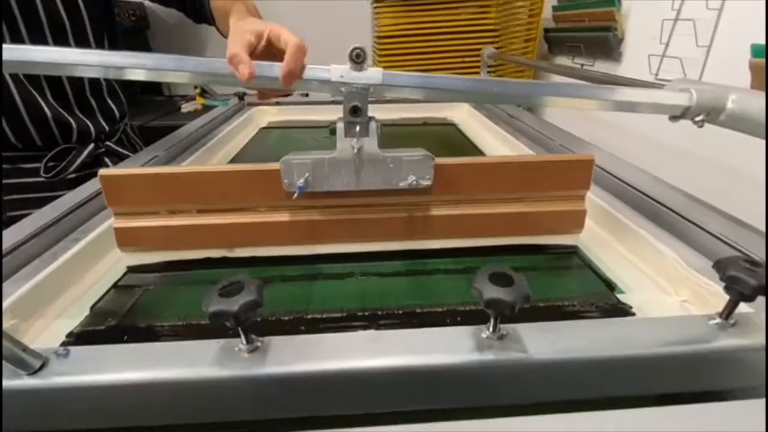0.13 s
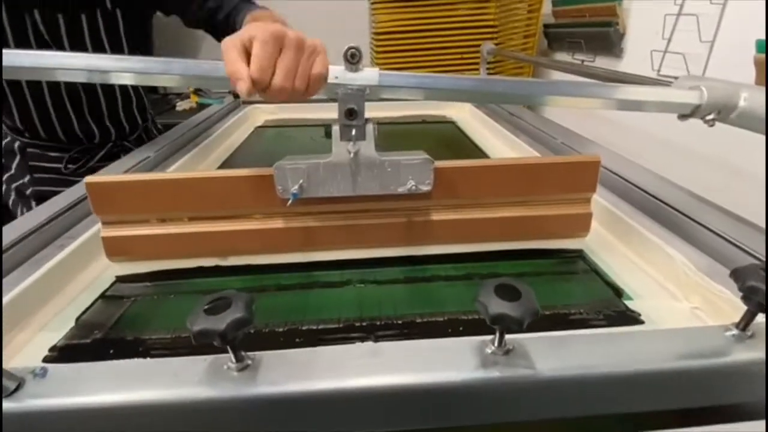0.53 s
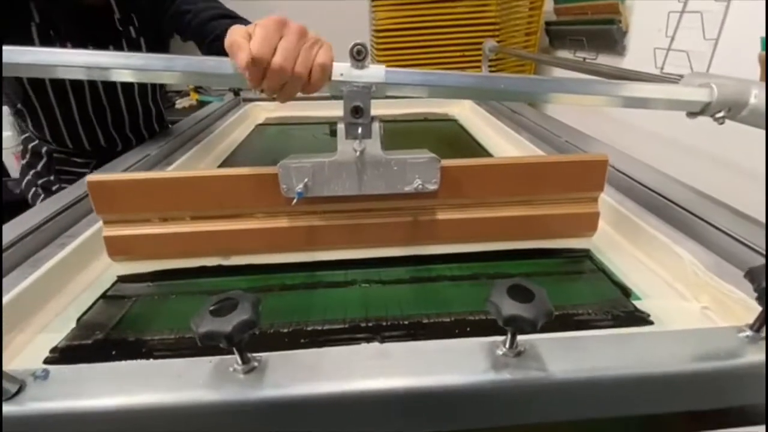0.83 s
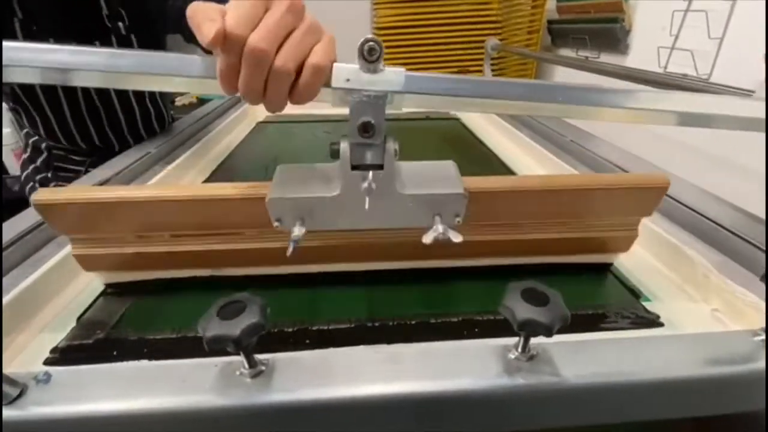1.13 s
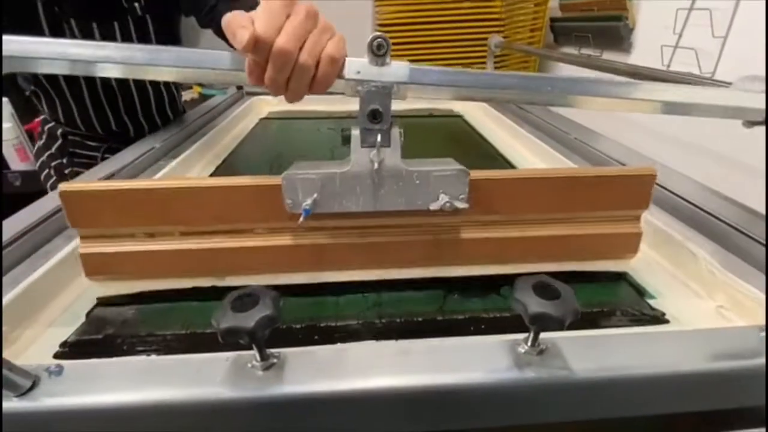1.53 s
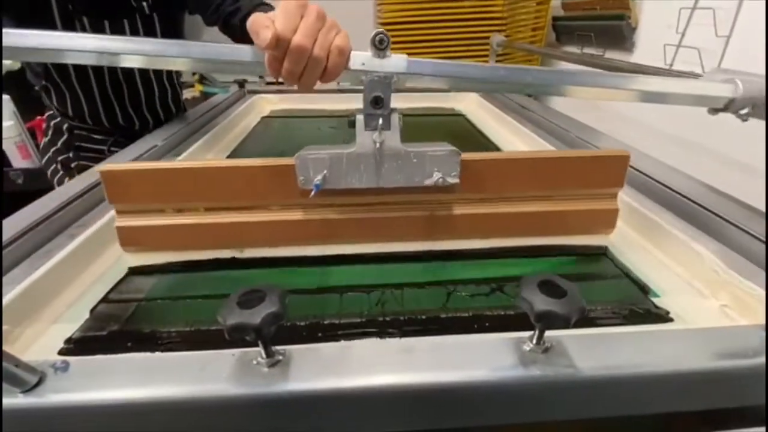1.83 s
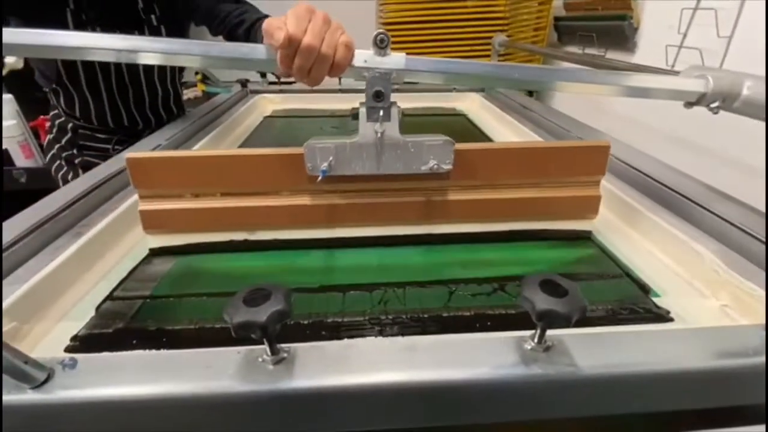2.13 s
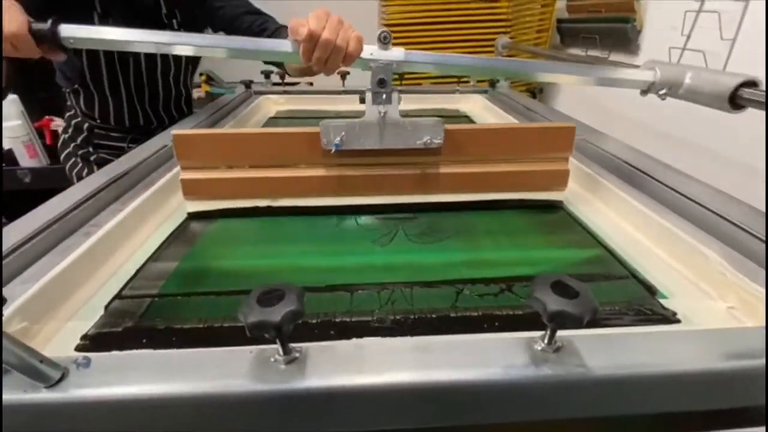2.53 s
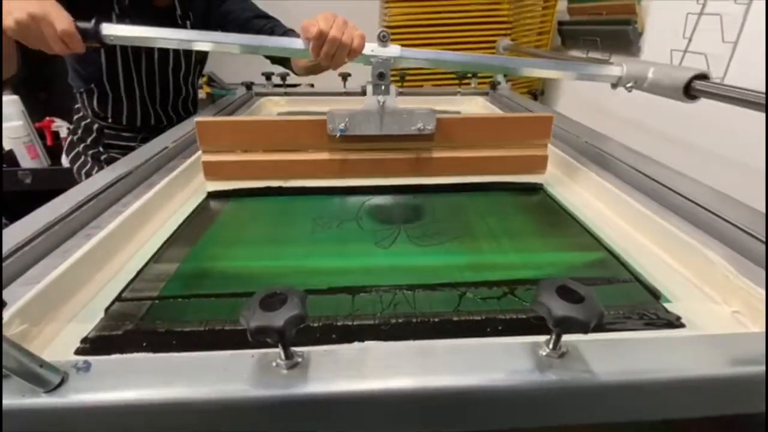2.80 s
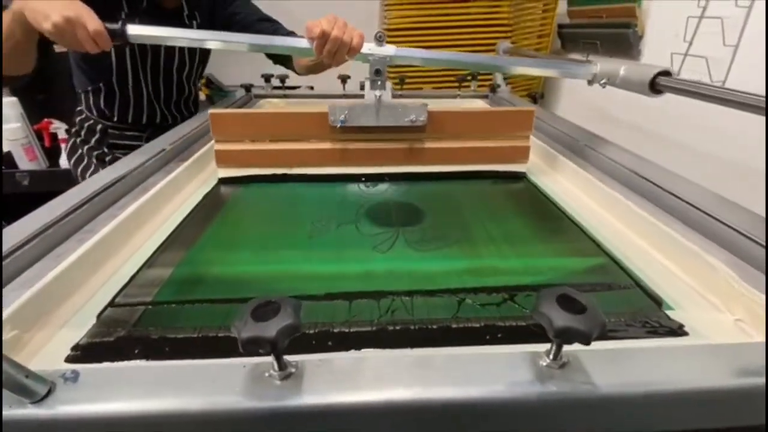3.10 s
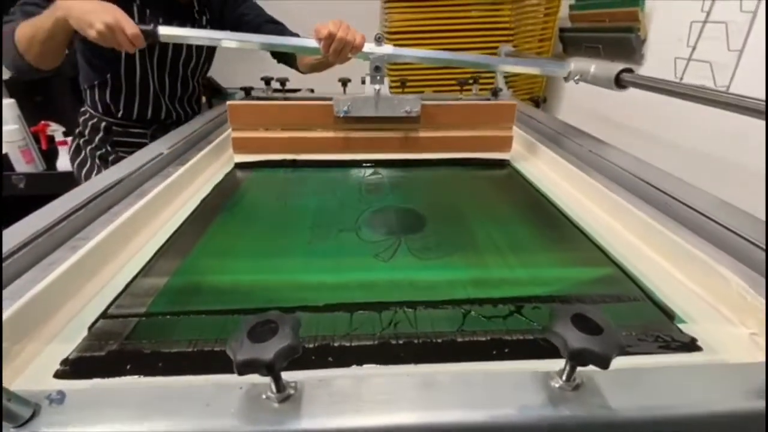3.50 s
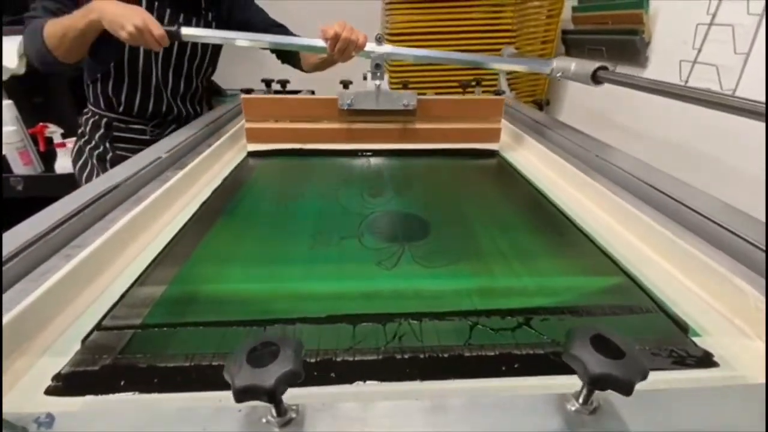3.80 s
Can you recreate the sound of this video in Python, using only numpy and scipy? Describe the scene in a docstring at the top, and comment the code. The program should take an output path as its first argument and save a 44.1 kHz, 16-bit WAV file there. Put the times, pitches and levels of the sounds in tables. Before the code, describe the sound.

A squeegee whirs across an inky printing screen after sharp clacks, over a machine hum.

```python
"""A machine hums and blows in a small workshop throughout. First a squeegee blade whirs briefly over a
printing screen. The carriage of its lever arm scuffs, then clacks against its stop at 0.9 s and rattles
in the frame. At 1.2 s the squeegee lands in the ink with a knock and a soft thump. From 1.6 s it is drawn
across the mesh twice, a short stroke and a long one, with one more clack at 2.4 s. The faster the blade
crosses the threads, the higher it whirs."""
import sys
import numpy as np
from scipy import signal
from scipy.fft import rfft, irfft, next_fast_len
from scipy.io import wavfile

SR = 44100
rng = np.random.default_rng(int(sys.argv[2]) if len(sys.argv) > 2 else 0)


def materialize(psi):
    """Save the field psi as 16-bit PCM at rate SR to the path in sys.argv[1].

    A 1-D psi becomes a single channel; in a 2-D psi each row is a channel.
    """
    bounded = np.clip(np.atleast_2d(psi).T, -1, 1)
    quanta = np.round(bounded * 32767).astype(np.int16)
    wavfile.write(sys.argv[1], SR, quanta)


N = 174195

def amp(db):
    """Turn decibels into a gain."""
    return 10 ** (np.asarray(db) / 20)

def unit(x):
    """Scale a signal to an average (rms) level of 1."""
    return x / np.sqrt(np.mean(x ** 2) + 1e-20)

def along(points, hz):
    """Read a curve of (Hz, value) points at any frequency, on a log axis."""
    freqs, values = np.transpose(points)
    return np.interp(np.log(hz + 1), np.log(freqs + 1), values)

def filtered(x, response):
    """Turn each frequency up or down by the gain response(hz)."""
    size = next_fast_len(N + SR // 2)
    return irfft(rfft(x, size) * response(np.fft.rfftfreq(size, 1 / SR)), size)[..., :N]

# How alike left and right sound. Each row: frequency in Hz, likeness (1 is identical).
STEREO_LIKENESS = [(60, 1), (140, 0.99), (300, 0.92), (600, 0.4), (1200, 0.055), (2500, 0.027),
                   (6000, 0.35), (11000, 0.096)]
def rush(gain):
    """Stereo noise shaped by gain(hz), nearly the same on both sides in the bass."""
    def response(hz):
        angle = np.arccos(np.clip(along(STEREO_LIKENESS, hz), -1, 1)) / 2
        return gain(hz) * np.array([np.cos(angle), np.sin(angle)])
    mid, side = filtered(rng.standard_normal((2, N)), response)
    return unit(np.array([mid + side, mid - side]))

def coloured(spectrum):
    """Stereo noise whose tone follows (Hz, dB) points."""
    return rush(lambda hz: amp(along(spectrum, hz)))

def noise_band(centre_hz, width_hz):
    """Stereo noise gathered around one frequency."""
    return rush(lambda hz: 1 / (1 + ((hz - centre_hz) / width_hz) ** 2))

def flutter(width_hz):
    """A random wobble for each channel; a larger width makes it faster."""
    return unit(filtered(rng.standard_normal((2, N)), lambda hz: np.exp(-(hz / width_hz) ** 2 / 2)))

def uneven(depth_db, speed_hz):
    """A gain that wobbles at random, to roughen a sound."""
    return unit(amp(depth_db * flutter(speed_hz)[0]))

def fuzzy(phase, width_hz):
    """A narrow band of noise around a pitch that may move."""
    x = flutter(width_hz) * np.cos(phase) + flutter(width_hz) * np.sin(phase)
    return unit(x + 0.13 * x[::-1])  # a little of each side leaks into the other

def wavering_tone(t, hz, wander_hz):
    """A tone whose pitch drifts at random."""
    drift = wander_hz * np.cumsum(flutter(7.08)[0]) / SR
    return np.sqrt(2) * np.sin(2 * np.pi * (hz * t + drift))

def ring(t, modes, start, db, attack_s):
    """One blow: an object rings at its own pitches (modes), each fading by 60 dB in its ring time."""
    age = np.maximum(t - start, 0)
    ringing = np.zeros(N)
    for hz, mode_db, ring_s in modes:
        fade = amp(mode_db + rng.normal(0, 1) - 60 * age / ring_s)
        ringing += fade * np.sin(2 * np.pi * hz * age + rng.uniform(0, 2 * np.pi))
    return amp(db) * ringing * (1 - np.exp(-age / attack_s))

# The machine's blowing air. Each row: frequency in Hz, relative level in dB.
AIR_SPECTRUM = [(20, -48), (40, -40), (75, -11.5), (150, -1.5), (240, -4.5), (300, -11), (400, -3),
                (540, -10), (680, -8.5), (900, -16.5), (1400, -13), (1800, -16), (2350, -23), (3600, -25),
                (4250, -34.5), (5000, -32), (7000, -40.5), (8400, -40), (11000, -44.5)]
# The swells and dips of its deep drone. Each row: time in seconds, level in dB.
DRONE_LEVELS = [(0, -29.5), (.2, -39), (.8, -34), (1.2, -35), (1.6, -33), (1.85, -43), (1.95, -28),
                (2.07, -36), (2.19, -37.5), (2.29, -28), (2.36, -37), (2.49, -30.5), (2.6, -37), (2.8, -38),
                (2.9, -27.5), (3.0, -32), (3.15, -40), (3.6, -34), (3.95, -32)]
# Where its casing resonates. Each row: frequency in Hz, width in Hz, level in dB.
CASING_RESONANCES = [(90.3, 18, -43), (194, 14.6, -48), (338.7, 28, -38.5)]
# Its thin motor tones. Each row: pitch in Hz, level in dB.
MOTOR_TONES = [(350, -44.5), (589, -51), (689, -53), (1081, -55), (1707, -53.5), (2182, -57.5),
               (4371, -69.5), (4797, -73), (6708, -73)]
def machine(t):
    """A running machine: air blows, a deep drone wavers, the casing resonates and the motor hums."""
    drone_hz = 136
    drone = unit(wavering_tone(t, drone_hz, wander_hz=6.01) + amp(-0.5) * noise_band(drone_hz, 15.7))
    drone *= amp(np.interp(t, *np.transpose(DRONE_LEVELS)))
    air = amp(-34) * coloured(AIR_SPECTRUM)
    casing = sum(amp(db) * noise_band(hz, width) for hz, width, db in CASING_RESONANCES)
    motor = sum(amp(db) * wavering_tone(t, hz, wander_hz=2.406) for hz, db in MOTOR_TONES)
    return air + drone + casing + motor

# One list per blade stroke. Each row: time in seconds, threads crossed per second (Hz), level in dB.
BLADE_STROKES = [
    [(0, 1553, -44), (.04, 1500, -36.5), (.08, 1421, -35), (.105, 993, -39), (.14, 790, -47)],
    [(1.59, 893, -47), (1.63, 1302, -35), (1.66, 1780, -33.5), (1.69, 1960, -34), (1.73, 1760, -33),
     (1.76, 1331, -27), (1.79, 979, -34), (1.82, 747.5, -36), (1.865, 699, -33.5), (1.885, 844, -42),
     (1.905, 1097, -35), (2.0, 987, -51), (2.1, 800.5, -49)],
    [(2.13, 848, -42), (2.18, 1192, -40.5), (2.225, 1559, -39.5), (2.275, 1630, -34.5), (2.335, 1493, -41),
     (2.4, 1716, -31), (2.45, 1988, -36.5), (2.51, 2096, -35), (2.565, 2116, -33.5), (2.62, 2303, -41.5),
     (2.68, 2285, -33), (2.72, 2020, -36.5), (2.78, 1834, -34), (2.87, 1871, -39.5), (2.95, 1890, -35.5),
     (3.0, 1453, -34), (3.05, 1500, -34.5), (3.09, 1858, -39), (3.15, 1944, -38.5), (3.25, 1786, -38),
     (3.33, 1690, -35.5), (3.4, 1766, -37.5), (3.44, 1995, -35), (3.5, 2140, -35), (3.54, 2232, -35.5),
     (3.565, 2374, -33.5), (3.61, 2436, -38), (3.655, 2355, -37.5), (3.685, 2107, -35.5),
     (3.72, 2054, -33.5), (3.745, 1870, -39), (3.8, 1940, -43), (3.86, 1907, -39), (3.905, 1980, -35.5),
     (3.95, 1953, -38.5)],
]
# Blurred extra tones of the whir. Each row: multiple of the pitch, relative level in dB, width in Hz.
WHIR_PARTIALS = [(.47, -18, 90), (1.96, -15, 338), (2.9, -21, 450)]
# The whistle of a lightly pressed blade, an octave up. One relative level in dB for each stroke.
WHISTLE_LEVELS = [-16, -16.5, -48]
# Ink fizzing as it is squeezed through the mesh. Each row: frequency in Hz, relative level in dB.
INK_SPECTRUM = [(3000, -31), (5500, -6), (6800, -20), (8200, 6), (11000, 1)]
# Rubber rubbing on the mesh. Each row: frequency in Hz, relative level in dB.
RUB_SPECTRUM = [(200, -2), (500, -1), (1200, -2.5), (1900, -3), (2700, -26), (3400, -21.5), (5000, -22),
                (11000, -34)]
def blade(t):
    """The blade whirs over the threads; its rubbing, ink fizz and whistle grow with its speed."""
    times, crossing_hz, _ = np.concatenate(BLADE_STROKES).T
    pitch = np.interp(t, times, crossing_hz)
    phase = 2 * np.pi * np.cumsum(pitch) / SR
    levels = []
    for times, _, db in map(np.transpose, BLADE_STROKES):
        seconds_outside = np.abs(t - np.clip(t, times[0], times[-1]))
        levels.append(amp(np.interp(t, times, db)) * np.exp(-seconds_outside / 0.01))
    whir_width_hz, damping_hz = 65, 4070  # the rubber damps partials above damping_hz
    whir = unit(fuzzy(phase, whir_width_hz) + fuzzy(0.98 * phase, width_hz=170))
    for multiple, db, width_hz in WHIR_PARTIALS:
        damping = np.sqrt(1 + (multiple * pitch / damping_hz) ** 10)
        whir += amp(db) * fuzzy(multiple * phase, width_hz) / damping
    whistle = fuzzy(2 * phase, 2 * whir_width_hz) + amp(-5) * fuzzy(3 * phase, 3 * whir_width_hz)
    whistle *= sum(amp(db) * level for db, level in zip(WHISTLE_LEVELS, levels))
    ink = amp(-21) * unit(uneven(depth_db=5, speed_hz=506) * coloured(INK_SPECTRUM))
    grip = uneven(depth_db=2.5, speed_hz=24.3)  # the blade grips unevenly
    rub = amp(-4.5) * uneven(depth_db=2, speed_hz=70) * coloured(RUB_SPECTRUM)
    speed_gain = amp(5.5 * np.log2(pitch / 2100))  # 5.5 dB more for each doubling of speed
    return sum(levels) * (grip * whir + speed_gain * (rub + ink)) + speed_gain ** 2 * whistle

# Light slides of the carriage and wet ink. Each row: peak time in seconds, width in seconds,
# low rattle in dB, scrape pitch in Hz, scrape in dB, bright rattle in dB.
CARRIAGE_SCUFFS = [(.49, .03, -57, 1670, -47, -52.5), (0.932, 0.012, -29, 1316, -47, -48),
                   (0.984, 0.024, -34.5, 1637, -33, -49), (1.055, 0.033, -41, 1666, -39.5, -58),
                   (1.025, 0.016, -48, 1720, -45, -43), (1.26, 0.012, -33.5, 2100, -40, -71),
                   (1.33, 0.03, -43, 1810, -48, -49.5), (1.409, 0.029, -33, 2300, -45, -49.5),
                   (2.543, 0.0073, -47, 2220, -48, -45)]
# The carriage's clacks. Each row: time in seconds, low, middle and bright rattle in dB,
# rise and fall in seconds.
CARRIAGE_CLACKS = [(0.8918, -20, -24.5, -21, 0.0097, 0.011), (1.234, -28.5, -27.5, -36.5, 0.0073, 0.012),
                   (2.401, -25, -28, -22, 0.018, 0.013)]
# How the arm and frame ring. Each row: pitch in Hz, relative level in dB, ring time in seconds.
FRAME_MODES = [(122, -15, .09), (202, -9, 0.25), (236, -5, 0.13), (328, -8, 0.11), (410, -13, .08),
               (486, 3.5, 0.09), (542, -14.5, 0.05), (691, -0.5, 0.057), (730, -3, 0.07), (1235, -9, .05),
               (1320, -11, 0.09), (1530, -17, .07)]
# The three layers of the rattle. Each row: frequency in Hz, relative level in dB.
LOW_SPECTRUM = [(25, -42), (70, -13), (240, -0.5), (480, 7.5), (720, -0.5), (1100, -2.5), (2000, -8),
                (4000, -51)]
MIDDLE_SPECTRUM = [(600, -1.5), (1200, -7.5), (1650, 4), (2100, -2), (2450, -4.5), (2900, -23), (6000, -30)]
BRIGHT_SPECTRUM = [(500, -2), (1800, -0.5), (2800, 2.5), (3800, -0.5), (5200, 1), (6600, 1), (8200, -2),
                   (11000, -2.5)]
def carriage(t):
    """The carriage slides and rattles; at its first clack it hits its stop and the frame rings."""
    def swell(age, rise, fall):
        return np.exp(1 - np.hypot(1, age / np.where(age < 0, rise, fall)))
    low, middle, bright = np.zeros((3, N))  # the level of each rattle layer over time
    scrapes = np.zeros((2, N))
    for peak, width, low_db, scrape_hz, scrape_db, bright_db in CARRIAGE_SCUFFS:
        slide = np.exp(-((t - peak) / width) ** 2 / 2)
        low += amp(low_db) * slide
        bright += amp(bright_db) * slide
        scrapes += amp(scrape_db) * slide * fuzzy(2 * np.pi * scrape_hz * t, width_hz=180)
    for peak, low_db, middle_db, bright_db, rise, fall in CARRIAGE_CLACKS:
        bright += amp(bright_db) * swell(t - peak, rise, fall)
        late_swell = swell(t - peak - 0.0028, rise, fall)
        low += amp(low_db) * late_swell
        middle += amp(middle_db) * late_swell
    bright *= uneven(depth_db=2, speed_hz=506)
    knock = ring(t, FRAME_MODES, start=0.8936, db=-12, attack_s=0.0015)
    rattle = low * coloured(LOW_SPECTRUM) + middle * coloured(MIDDLE_SPECTRUM)
    rattle += bright * coloured(BRIGHT_SPECTRUM)
    return scrapes + knock + rattle

def workshop_echo(x, t):
    """The small room answers with a short, smooth echo."""
    ring_s = 0.46
    tail = rng.standard_normal((2, SR // 2)) * amp(-60 * t[:SR // 2] / ring_s)
    return signal.fftconvolve(x, tail / np.linalg.norm(tail[0]), axes=1)[:, :N]

# How the wooden squeegee rings. Each row: pitch in Hz, relative level in dB, ring time in seconds.
SQUEEGEE_MODES = [(402, 0.5, 0.063), (436, 1, 0.041), (514, -11, .18), (640, -13, .2), (1000, -15, 0.049),
                  (1620, -12, 0.082), (2010, -17, 0.089)]
def squeegee_landing(t):
    """The squeegee knocks as it lands; the taut mesh takes the blade with one soft, low thump."""
    knock = ring(t, SQUEEGEE_MODES, start=1.2335, db=-14.5, attack_s=0.004)
    thump_start, thump_hz, rise_s, ring_s = 1.258, 56.6, 0.018, 0.38
    age = np.maximum(t - thump_start, 0)
    thump_level = amp(-23.5 - 60 * age / ring_s) * (1 - np.exp(-age / rise_s))
    return knock + thump_level * np.sin(2 * np.pi * thump_hz * age)

def scene():
    """The press close by and the machine behind it; only the carriage echoes in the room."""
    t = np.arange(N) / SR
    clacks = carriage(t)
    echo = amp(-10.5) * workshop_echo(clacks, t)
    return clacks + echo + blade(t) + squeegee_landing(t) + machine(t)

# Which microphone is louder. Each row: frequency in Hz, left minus right in dB.
MIC_BALANCE = [(50, -1), (110, -1.5), (190, 2), (350, 3), (620, 2.5), (1200, 1.5), (1700, 3.5),
               (2250, -2.5), (3500, 3), (4300, 0.5), (5400, 3), (6800, 6), (8200, -10.5), (11000, 0)]
def record(dry):
    """Each microphone has its own tone; loud peaks are rounded off and the highest treble is cut."""
    ceiling, top_hz = 0.7, 11100
    x = filtered(dry, lambda hz: amp(along(MIC_BALANCE, hz) * np.array([[.5], [-.5]])))
    rounded = x / (1 + (x / ceiling) ** 4) ** (1 / 4)
    return filtered(rounded, lambda hz: hz < top_hz)

dry = scene()
out = record(dry)
materialize(out)
```